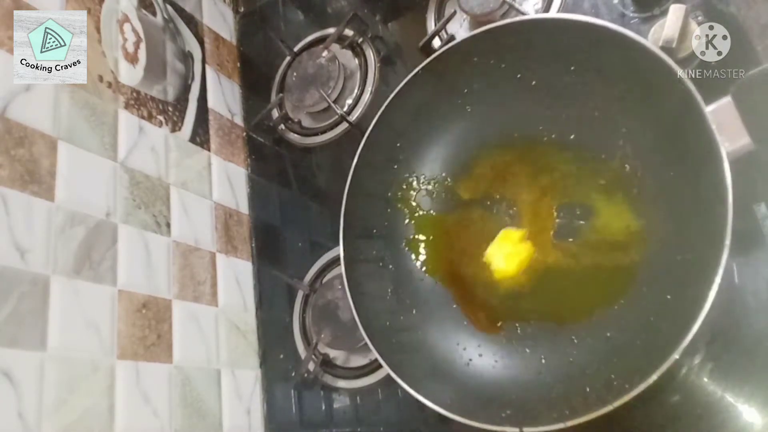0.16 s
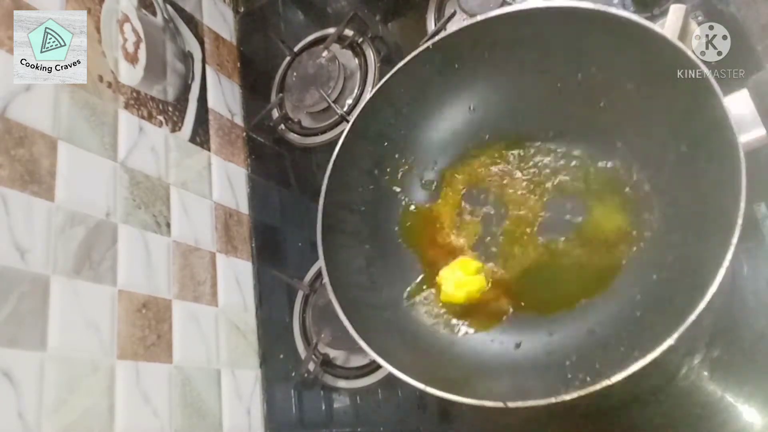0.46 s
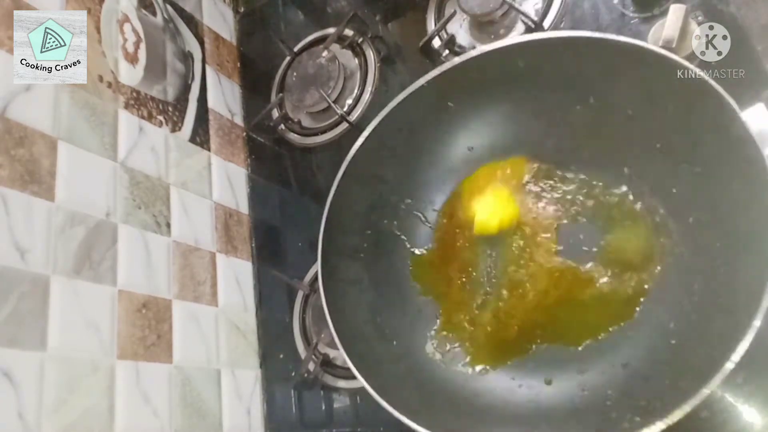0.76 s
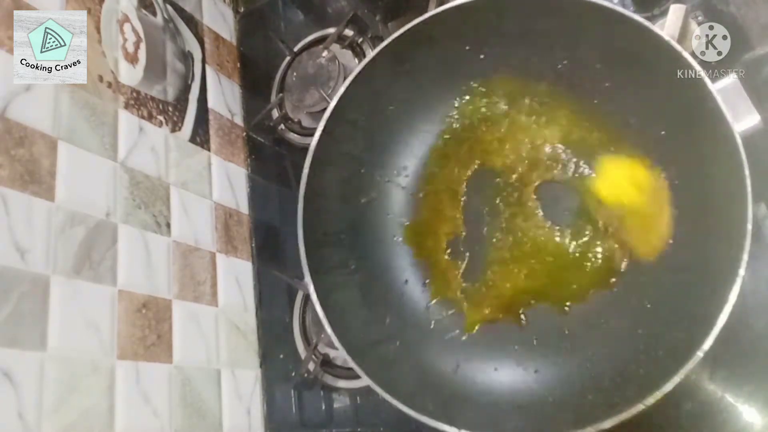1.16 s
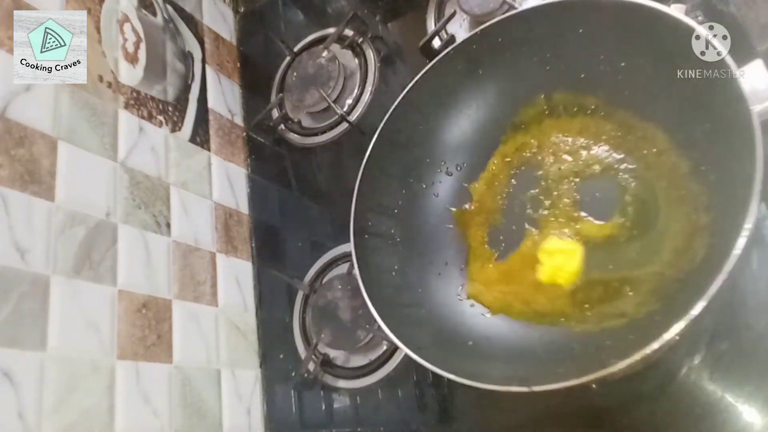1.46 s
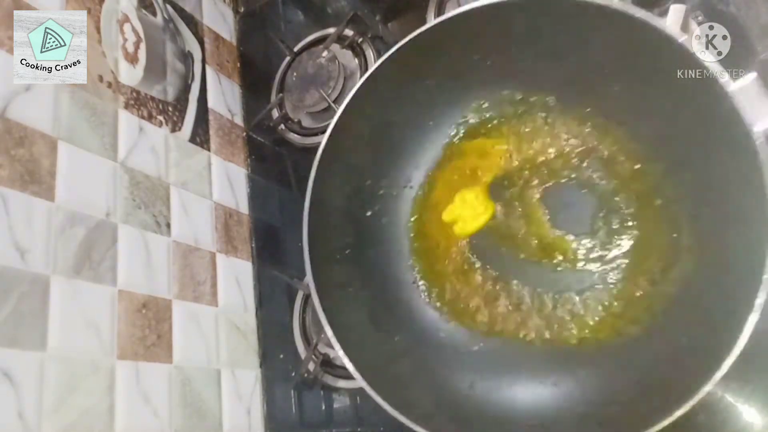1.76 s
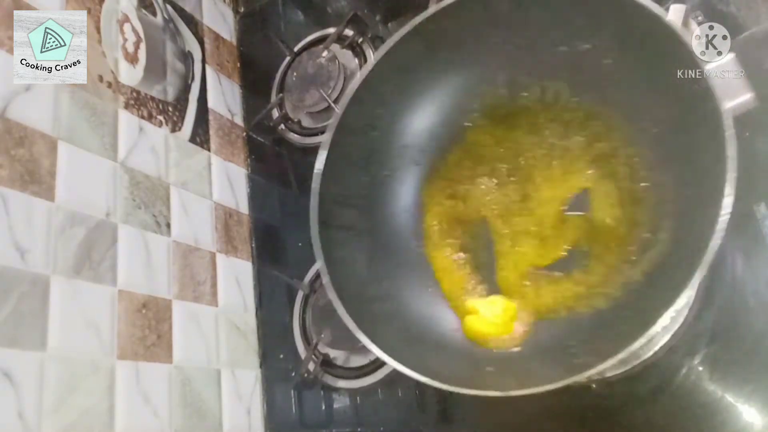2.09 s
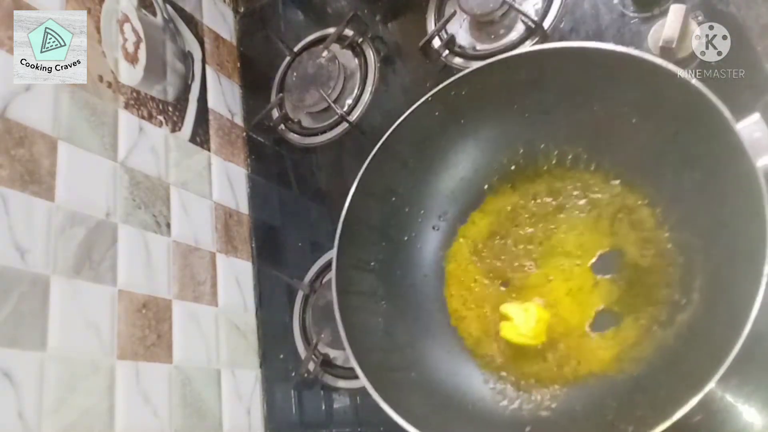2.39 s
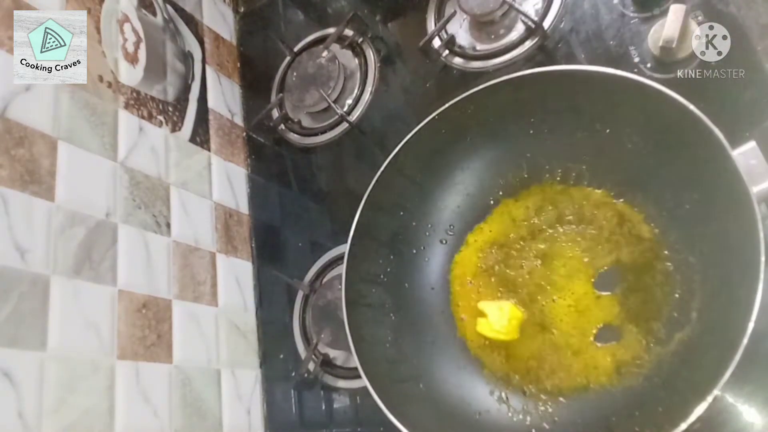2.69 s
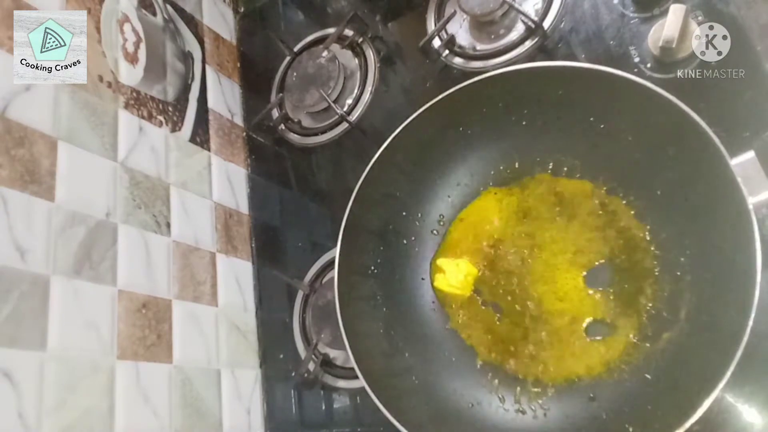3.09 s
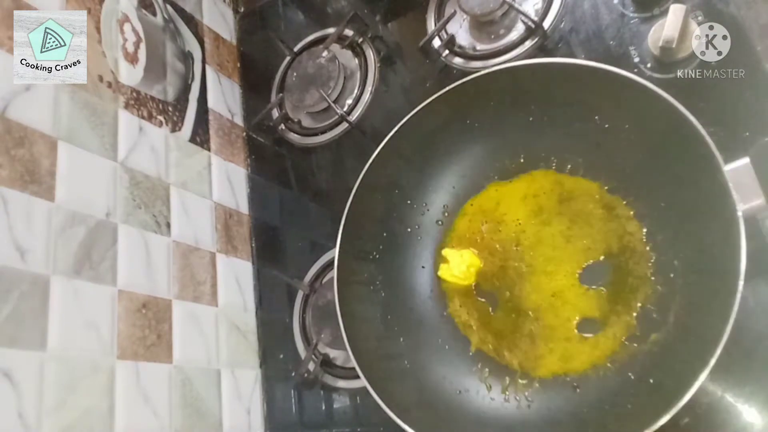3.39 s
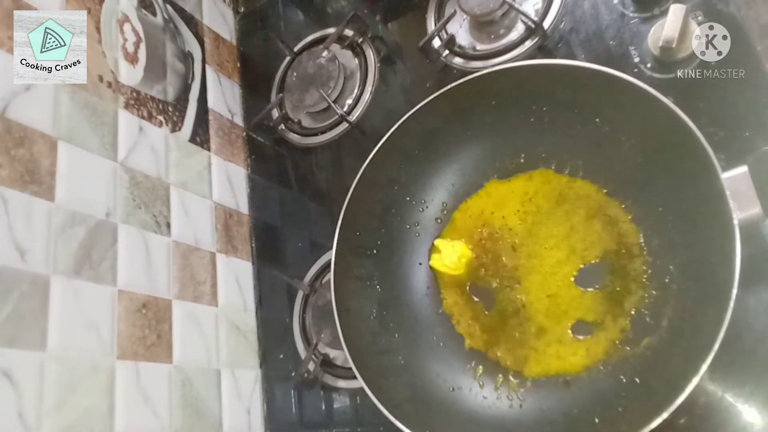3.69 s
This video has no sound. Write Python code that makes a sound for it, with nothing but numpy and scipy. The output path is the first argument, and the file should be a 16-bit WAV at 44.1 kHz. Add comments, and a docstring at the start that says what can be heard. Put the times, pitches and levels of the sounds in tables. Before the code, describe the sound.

Butter sizzles in hot oil throughout, heard close above the pan in a small kitchen; an early loud pan knock, spits, sliding, then softer knocks as the pan is set down.

```python
"""A small kitchen, one microphone close above a nonstick pan: butter sizzles in hot oil throughout.
Sizzle is dense random clicks, hiss and short pings, hollowed by a pan-wall echo, over a low noise rumble.
The swirled pan soon knocks the grate: damped modes, a clack and a tick, with dull noise thuds from the stove.
Spits crack and ping, the pan slides; it is set down, and more spits, knocks and rough slides follow.
Decaying noise gives the room to the frying and the knocks; the recorder cuts the top."""
import sys
import numpy as np
from scipy import signal
from scipy.fft import rfft, irfft
from scipy.io import wavfile
from scipy.ndimage import map_coordinates

SR = 44100
rng = np.random.default_rng(int(sys.argv[2]) if len(sys.argv) > 2 else 0)


def generate_wav(sig):
    """Save sig (samples, or channels by samples) to the path in sys.argv[1] as 16-bit PCM at SR."""
    pcm = np.round(np.clip(np.atleast_2d(sig).T, -1, 1) * 32767).astype(np.int16)
    wavfile.write(sys.argv[1], SR, pcm)


N = 169785  # samples


def undb(db):
    """Decibels to gain."""
    return 10 ** (np.asarray(db) / 20)


def unit(x):
    """Scale to rms 1."""
    return x / np.sqrt(np.mean(x ** 2))


def curve(table, axis=1):
    """One column of a time table, joined by straight lines."""
    table = np.array(table)
    return np.interp(np.arange(N) / SR, table[:, 0], table[:, axis])


def colour(x, points):
    """Causal minimum-phase filter that follows (frequency [Hz], gain [dB]) points."""
    hz, db = np.array(points).T
    size = 4096
    f = np.maximum(np.fft.rfftfreq(size, 1 / SR), 1)
    gain = undb(np.interp(np.log(f), np.log(hz), db))
    cepstrum = irfft(np.log(gain))
    # folding the cepstrum forward in time makes the filter causal
    cepstrum[1:size // 2] *= 2
    cepstrum[size // 2 + 1:] = 0
    impulse_response = irfft(np.exp(rfft(cepstrum)))
    return signal.fftconvolve(x, impulse_response)[:len(x)]


def ring(x, hz, t60):
    """One damped mode driven by x; a blow dies by 60 dB in t60 seconds."""
    pole = np.exp((2j * np.pi * hz - np.log(1000) / t60) / SR)
    return signal.lfilter([1], [1, -pole], x).imag


def walk(rate):
    """Random wander of rms 1 through a new level `rate` times a second."""
    knots = rng.standard_normal(2048)
    return unit(np.interp(np.arange(N) / SR * rate, np.arange(len(knots)), knots))


def clicks(per_s, spread_db):
    """Randomly timed impulses of uneven size and either sign."""
    size = undb(spread_db * np.minimum(rng.standard_normal(N), 2.5))
    present = rng.random(N) < per_s / SR
    return present * size * rng.choice([-1, 1], N)


def add(out, s, sound):
    """Mix a sound in at s seconds."""
    start = max(int(s * SR), 0)
    out[start:start + len(sound)] += sound[:N - start]


# the pan's faint ring, shared by the sizzle and the spits
PAN_RING_HZ, PAN_RING_T60_S = 1601, 0.03

# fine bubbles before flutter and echoes: (time [s], level [dB])
FINE_LEVEL = [(0, -52.5), (.25, -53.5), (.57, -49.5), (.77, -51.5), (1.07, -49.5), (1.2, -53.3),
              (1.38, -53), (1.52, -51), (1.65, -48), (1.85, -46.6), (2.05, -50), (2.45, -50), (2.68, -49.5),
              (2.9, -51.5), (3.2, -52), (3.5, -53), (3.7, -53.5), (3.85, -55.5)]
# coarse bubbles before flutter and echoes: (time [s], level [dB])
COARSE_LEVEL = [(0, -64), (.2, -65), (.6, -60), (.85, -60), (1.1, -60.5), (1.3, -63.5), (1.62, -56),
                (1.9, -58.5), (2.3, -59.5), (2.65, -62.5), (3.05, -64), (3.55, -65.5), (3.7, -64.5),
                (3.85, -66)]
# colour of the fine bubbles: (frequency [Hz], relative density [dB per Hz])
FINE_COLOUR = [(3000, -31.5), (4400, -16), (5300, -10), (6600, -6.5), (7400, -2.5), (8100, -1), (8650, -5),
               (9450, 2.5), (9900, 0.5), (10600, -6), (12500, -9.5), (15500, -17.5)]
# colour of the coarse bubbles: (frequency [Hz], relative density [dB per Hz])
COARSE_COLOUR = [(250, -35), (600, -13), (850, -4.5), (1400, -13), (1900, -2.5), (2300, 2), (3300, 3),
                 (4080, 6), (4350, 4.5), (5400, 7), (7000, 2.5), (10000, -25.5)]
BURSTS_PER_S, BURST_SPREAD_DB = 6000, 5
HISS_DB = -3.5  # against the bursts
BUBBLES_PER_S, BUBBLE_SPREAD_DB = 3500, 7
BUBBLE_DB = -4.5  # pings added to the fine bursts before colouring
BUBBLE_LOW_HZ, BUBBLE_HIGH_HZ = 4454, 12220
BUBBLE_CYCLES = 5.7  # cycles for a ping to fall to 1/e
PAN_RING_DB = -7.5  # against the coarse bubbles
FLUTTER_DB = 0.63  # rms


def steam_bursts():
    """Bursting steam bubbles are random clicks; the steam between them is white hiss."""
    bursts = unit(clicks(BURSTS_PER_S, BURST_SPREAD_DB))
    return bursts + undb(HISS_DB) * rng.standard_normal(N)


def bubble_pings():
    """Small bubbles ring briefly, each pitch for the same number of cycles."""
    pitches = np.geomspace(BUBBLE_LOW_HZ, BUBBLE_HIGH_HZ, num=24)
    pings = np.zeros(N)
    for hz in pitches:
        pops = clicks(BUBBLES_PER_S / len(pitches), BUBBLE_SPREAD_DB)
        t60 = np.log(1000) * BUBBLE_CYCLES / hz
        # the root offsets the shorter ring of high pitches
        pings += ring(pops, hz, t60) * np.sqrt(hz)
    return unit(pings)


def sizzle():
    """Fine bursts and pings above, coarse bursts that ring the pan below, under one quick flutter."""
    fine, coarse = steam_bursts(), steam_bursts()
    top = unit(colour(fine + undb(BUBBLE_DB) * bubble_pings(), FINE_COLOUR))
    pan = undb(PAN_RING_DB) * unit(ring(coarse, PAN_RING_HZ, PAN_RING_T60_S))
    low = unit(colour(coarse, COARSE_COLOUR)) + pan
    frying = top * undb(curve(FINE_LEVEL)) + low * undb(curve(COARSE_LEVEL))
    return frying * undb(FLUTTER_DB * walk(60))


# reflection off the pan wall as the pan settles: (time [s], lag [ms], share [fraction of direct sound])
WALL_ECHO = [(0, 0.43, 0.049), (2.45, 0.47, 0.064), (2.7, 0.38, 0.42), (3.0, 0.32, 0.49), (3.25, 0.3, 0.5),
             (3.55, 0.26, 0.63), (3.7, .33, 0.56), (3.85, 0.44, 0.012)]
WALL_TOP_HZ = 7000


def pan_wall(x):
    """A dulled, inverted reflection with a gliding lag hollows out the frying."""
    low_pass = signal.butter(4, WALL_TOP_HZ, fs=SR, output="sos")
    dull = signal.sosfiltfilt(low_pass, x)
    place = np.arange(N) - curve(WALL_ECHO) * SR / 1000
    echo = map_coordinates(dull, [place], mode="nearest")
    share = np.clip(curve(WALL_ECHO, axis=2), 0, .9)
    return x - share * echo


SIZZLE_ROOM_DB, KNOCK_ROOM_DB = -15, -4
ROOM_T60_S, ROOM_DELAY_S = .33, 0.0036


def kitchen(x, wet_db):
    """Dense reflections off a small room, as decaying noise, die away quickly."""
    t = np.arange(SR // 2) / SR
    decay = np.exp(-np.log(1000) * t / ROOM_T60_S)
    tail = rng.standard_normal(len(t)) * decay * (t > ROOM_DELAY_S)
    return x + undb(wet_db) * signal.fftconvolve(x, tail / np.linalg.norm(tail))[:N]


# low rumble before its wander: (time [s], level [dB])
RUMBLE_LEVEL = [(0, -77.5), (.6, -84), (.9, -83.5), (1.05, -81.5), (1.3, -78), (2.0, -84.5), (2.3, -83),
                (2.48, -73.5), (2.9, -79.5), (3.28, -73.5), (3.55, -77.5), (3.85, -81)]
# colour of the rumble: (frequency [Hz], relative density [dB per Hz])
RUMBLE_SPECTRUM = [(25, -38), (60, -17.5), (100, 0.5), (135, 5), (190, 2.5), (260, -13.5), (500, -10),
                   (1200, -45), (5000, -80)]


def rumble():
    """Low coloured noise whose level wavers slowly."""
    noise = unit(colour(rng.standard_normal(N), RUMBLE_SPECTRUM))
    waver_db = 1.7 * walk(4)
    return undb(curve(RUMBLE_LEVEL) + waver_db) * noise


# pan on the grate: (time [s], low level [dB], middle level [dB], high level [dB], tick level [dB],
# ring length [factor], frequency the point of contact favours [Hz], scrape decay to 1/e [s])
GRATE_KNOCKS = [(0.0517, -36, -42.5, -38, -45, 0.76, 757, 0.014),
                (1.391, -71, -44, -39, -49.5, 0.34, 900, .003),
                (1.4034, -56, -48, -70, -72, 0.23, 910, .004),
                (2.6363, -46.5, -47.5, -50, -51.5, 0.65, 620, .012),
                (2.6905, -74, -67, -78, -74, 0.4, 970, .006),
                (3.0377, -77, -48, -42.5, -54, 0.41, 1036, .002),
                (3.3711, -49.5, -49, -63, -54, 0.49, 610, .012),
                (3.389, -55, -55.5, -51, -54.5, 0.67, 925, 0.0097)]
# where the low, middle and high levels apply: frequency [Hz]
LEVEL_HZ = [270, 1030, 1660]
# modes of the pan before each knock's levels: (frequency [Hz], level [dB], t60 before ring length [s])
MODES = [(194, -26, 0.11), (250, -4, 0.17), (450, -6, .08), (580, -20, 0.13), (826, -5.5, 0.11),
         (970, -11, 0.13), (1107, -0.5, 0.043), (1191, -5.5, 0.058), (1343, -7, 0.068), (1575, -5.5, 0.15),
         (1630, -1, 0.068), (2130, -6, 0.058)]
# colour of the clack before each knock's levels: (frequency [Hz], gain [dB])
CLACK_COLOUR = [(80, -17), (200, 15), (500, -23), (900, 5), (1750, -39), (2150, -3), (2500, -28),
                (8000, -60)]
# colour of the tick: (frequency [Hz], relative gain [dB])
TICK_COLOUR = [(1800, -17), (2700, -6.5), (3600, -22.5), (4700, -5.5), (6300, -4.5), (8000, -5),
               (11000, -41), (16000, -43)]
FOCUS_DB, FOCUS_OCTAVES = 15, 0.19  # extra level at the favoured frequency, and its half width
MODE_SCATTER = 0.006  # spread of mode pitch, as a fraction
BLOW_DB, CLACK_DB = 33, -8  # impulse against the scrape noise; clack against the modes
TICK_DECAY_S = 0.013  # to 1/e


def knocks():
    """Each contact ticks, clacks and rings the pan; its spot favours some modes and sets the damping."""
    out, t = np.zeros(N), np.arange(SR // 2) / SR
    impulse = t == 0
    for s, low_db, mid_db, high_db, tick_db, length, focus_hz, scrape_s in GRATE_KNOCKS:
        def strength(hz):
            """Level [dB] that this contact gives to a frequency."""
            focus = FOCUS_DB * np.exp(-(np.log2(hz / focus_hz) / FOCUS_OCTAVES) ** 2)
            return focus + np.interp(np.log(hz), np.log(LEVEL_HZ), [low_db, mid_db, high_db])

        modes = np.zeros(len(t))
        for hz, db, t60 in MODES:
            mode_hz = hz * (1 + MODE_SCATTER * rng.standard_normal())
            modes += undb(db + strength(hz)) * ring(impulse, mode_hz, t60 * length)
        scrape = rng.standard_normal(len(t)) * np.exp(-t / scrape_s)
        contact = undb(BLOW_DB) * impulse + scrape
        clack = colour(contact, [(hz, db + strength(hz)) for hz, db in CLACK_COLOUR])
        tick_noise = unit(colour(rng.standard_normal(len(t)), TICK_COLOUR))
        tick = undb(tick_db) * tick_noise * np.exp(-t / TICK_DECAY_S)
        # (Hz, dB) filter shared by modes and clack
        body_colour = [(30, -22), (120, -13), (1900, 2.5), (2400, -21), (4000, -16)]
        body = colour(modes + undb(CLACK_DB) * clack, body_colour)
        add(out, s, body + tick)
    return out


# dull thuds of the stove under the pan: (start time [s], level at the height of the swell [dB])
STOVE_THUDS = [(.06, -51.5), (0.584, -75.5), (1.396, -63.5), (2.643, -62.5), (2.71, -73.5), (3.045, -66.5),
               (3.388, -64.5)]
# colour of the thuds: (frequency [Hz], relative density [dB per Hz])
THUD_SPECTRUM = [(30, -51), (70, -12.5), (110, -7), (190, -0.5), (300, -9), (700, -21.5), (2000, -51)]
THUD_RISE_S = 0.024


def thuds():
    """The stove under the pan answers with low noise that swells and dies away."""
    t = np.arange(N) / SR
    swell = np.zeros(N)
    for s, db in STOVE_THUDS:
        age = np.maximum(t - s, 0) / THUD_RISE_S
        swell += undb(db) * age * np.exp(1 - age)  # peaks at age 1
    return swell * unit(colour(rng.standard_normal(N), THUD_SPECTRUM))


# louder spits of fat before echoes: (time [s], level [dB], pitch [Hz])
FAT_SPITS = [(0.8116, -39, 9600), (0.8576, -38.5, 7000), (1.006, -39, 5960), (2.7863, -42, 9400),
             (3.0975, -38, 5600), (3.314, -40, 6000), (3.345, -43, 10000), (3.3557, -42, 5600)]
# colour of a spit: (frequency [Hz], gain [dB])
SPIT_SPECTRUM = [(300, -45), (3000, -12), (5000, 1), (11000, 2), (15000, -2)]
SPIT_DECAY_S = 0.001  # to 1/e
SPIT_CRACK, SPIT_RING_DB = 0.55, -20  # noise against the ping; trace of pan ring


def spits():
    """Larger bubbles burst with a crack, a short ping and a trace of the pan's ring."""
    out, t = np.zeros(N), np.arange(SR // 20) / SR
    for s, db, hz in FAT_SPITS:
        ping = np.sin(2 * np.pi * hz * t)
        crack = SPIT_CRACK * rng.standard_normal(len(t))
        pop = np.exp(-t / SPIT_DECAY_S) * (ping + crack)
        pan = undb(SPIT_RING_DB) * ring(t == 0, PAN_RING_HZ, PAN_RING_T60_S)
        add(out, s, undb(db) * (colour(pop, SPIT_SPECTRUM) + pan))
    return out


# pan sliding on the grate: (middle time [s], half length to 1/e [s], level at the middle [dB])
GRATE_SLIDES = [(1.62, 0.04, -68.5), (1.723, 0.079, -63.5), (2.517, 0.12, -74.5), (3.608, 0.045, -76.5),
                (3.76, 0.057, -70)]
# colour of the slide: (frequency [Hz], relative density [dB per Hz])
SLIDE_COLOUR = [(80, -31), (170, -4), (420, 1), (620, -4.5), (900, -3.5), (1400, -10.5), (2500, -17),
                (8000, -40)]
SLIDE_CATCHES_PER_S, SLIDE_SPREAD_DB = 900, 3


def slides():
    """The pan catches on the rough grate in random clicks that swell and fade with the pressure."""
    t = np.arange(N) / SR
    pressure = sum(undb(db) * np.exp(-((t - s) / half) ** 2) for s, half, db in GRATE_SLIDES)
    catches = clicks(SLIDE_CATCHES_PER_S, SLIDE_SPREAD_DB)
    return pressure * unit(colour(catches, SLIDE_COLOUR))


def scene():
    """Everything at one microphone above the pan."""
    frying = kitchen(pan_wall(sizzle() + spits()), SIZZLE_ROOM_DB)
    knocking = kitchen(knocks(), KNOCK_ROOM_DB)
    return (frying + rumble() + knocking + thuds() + slides())[None]


TOP_HZ = 15600


def record(dry):
    """The recorder cuts the top steeply."""
    low_pass = signal.ellip(12, .1, 70, TOP_HZ, fs=SR, output="sos")
    return signal.sosfilt(low_pass, dry)


dry = scene()
out = record(dry)
generate_wav(out)
```